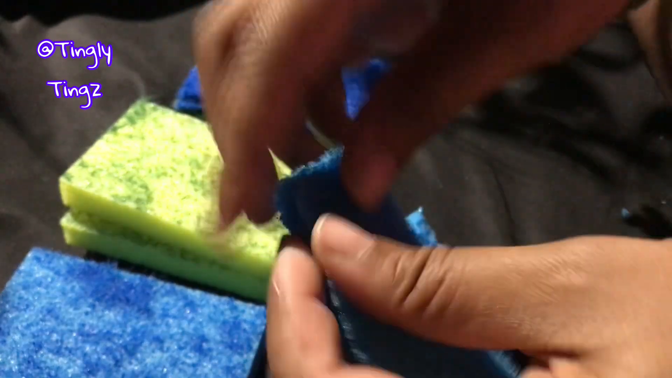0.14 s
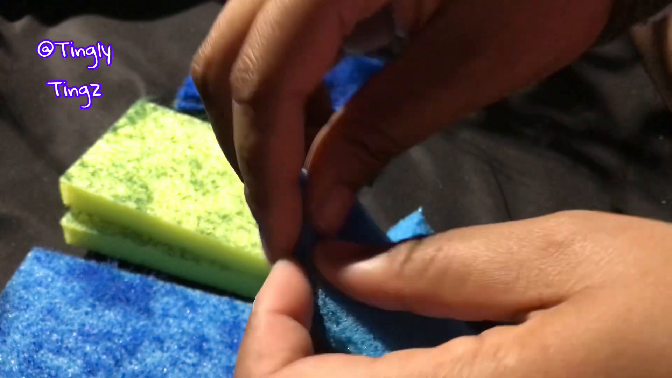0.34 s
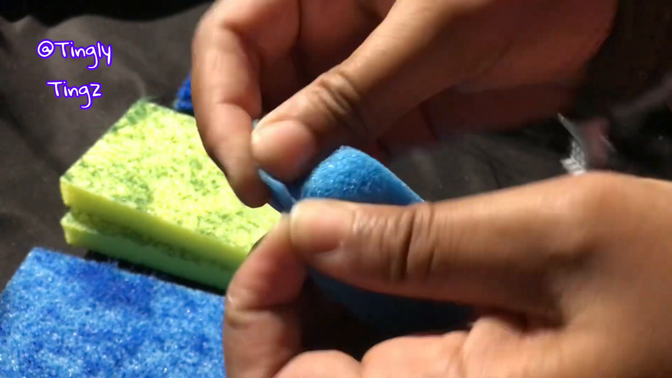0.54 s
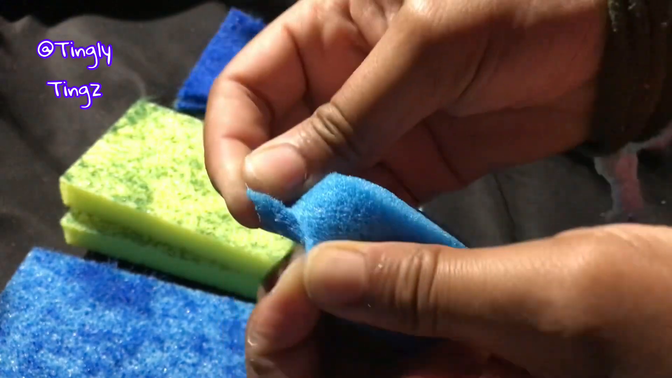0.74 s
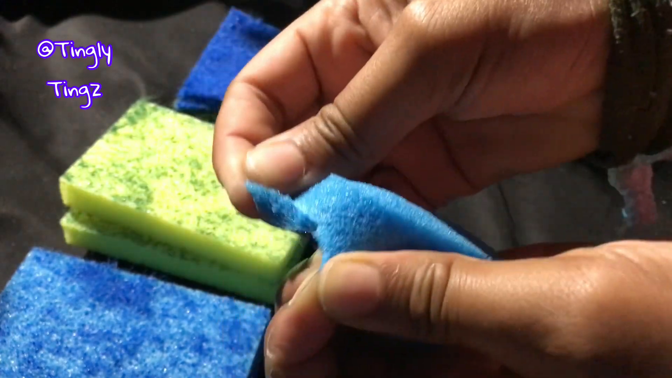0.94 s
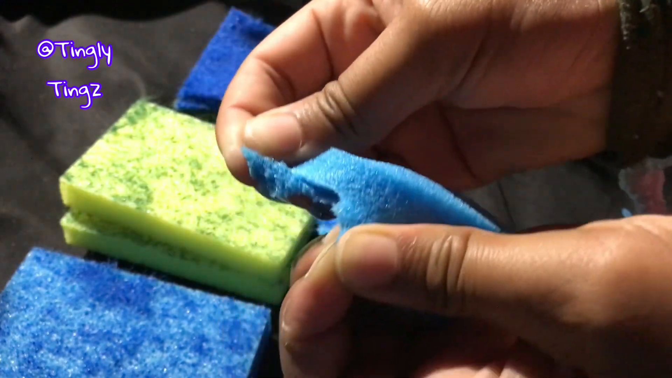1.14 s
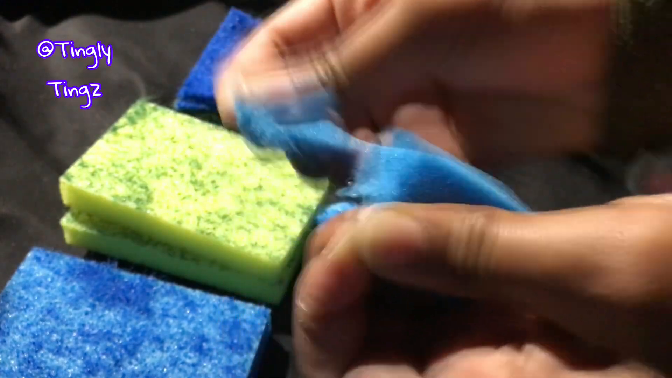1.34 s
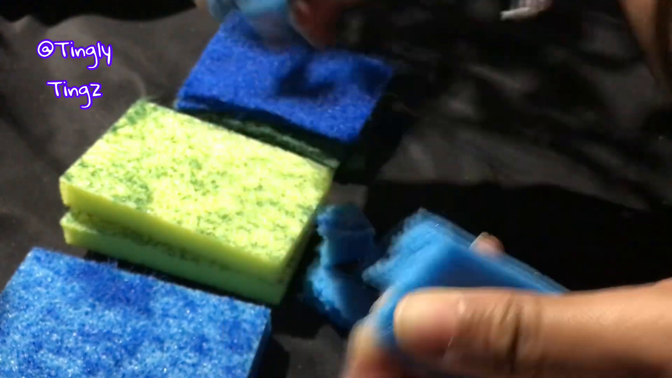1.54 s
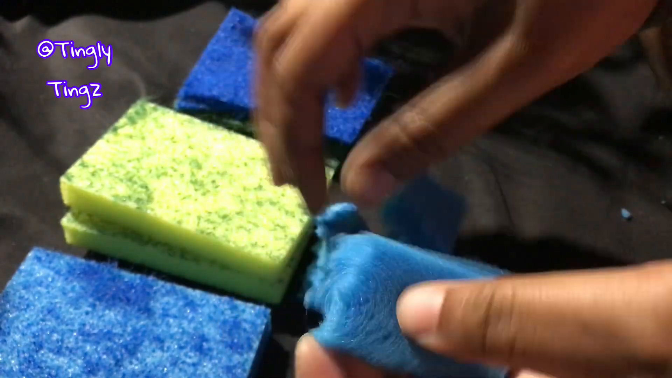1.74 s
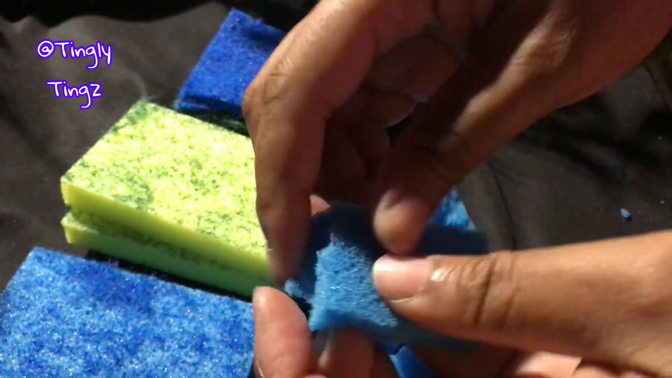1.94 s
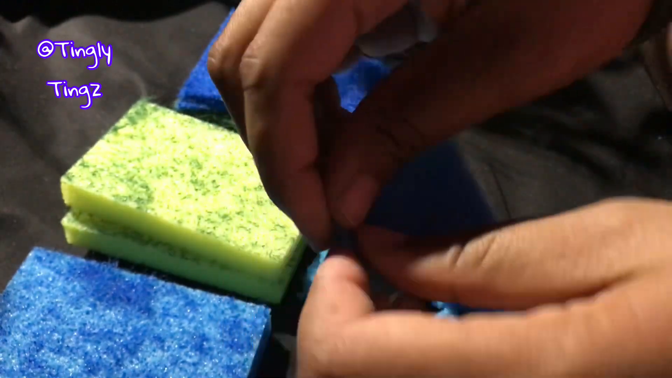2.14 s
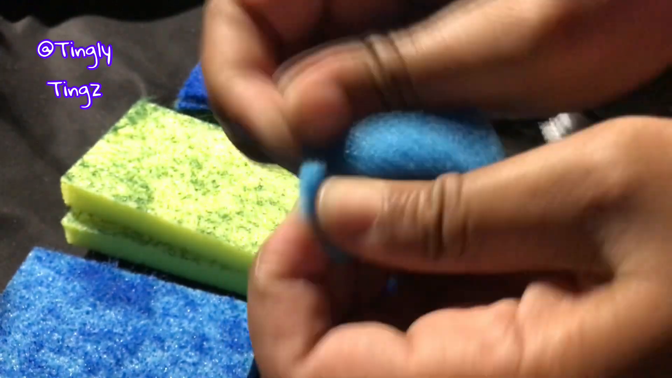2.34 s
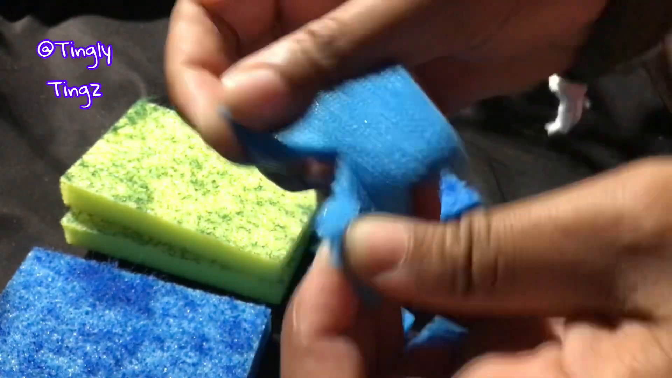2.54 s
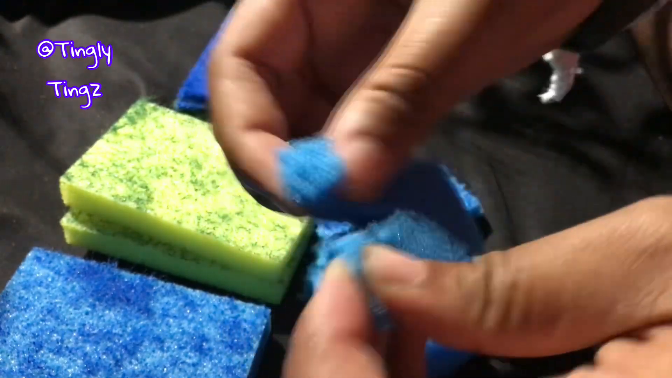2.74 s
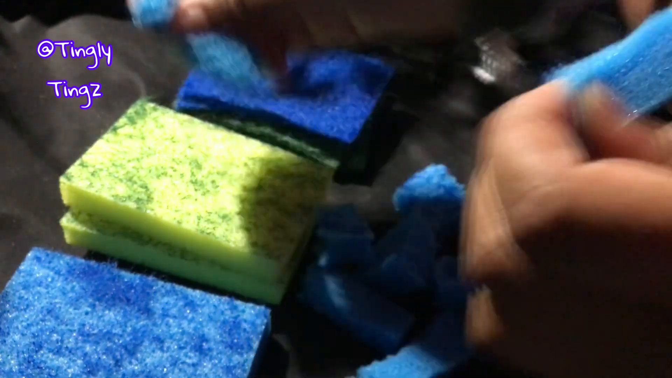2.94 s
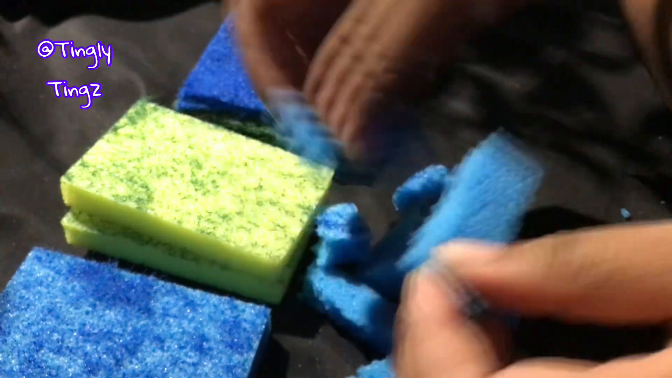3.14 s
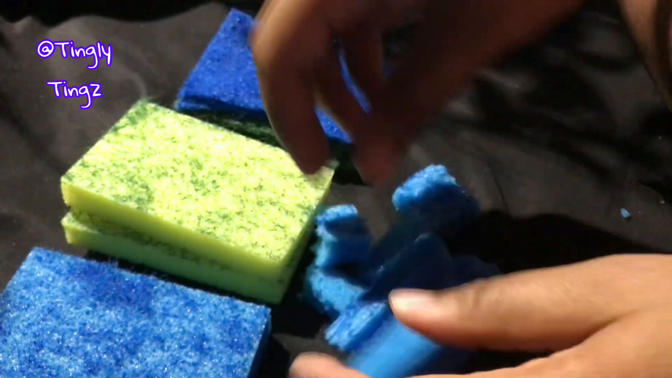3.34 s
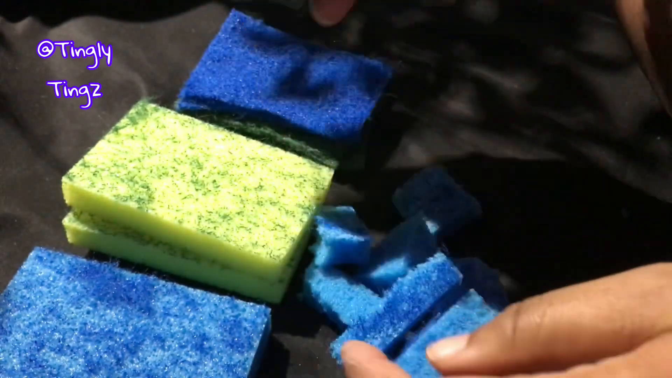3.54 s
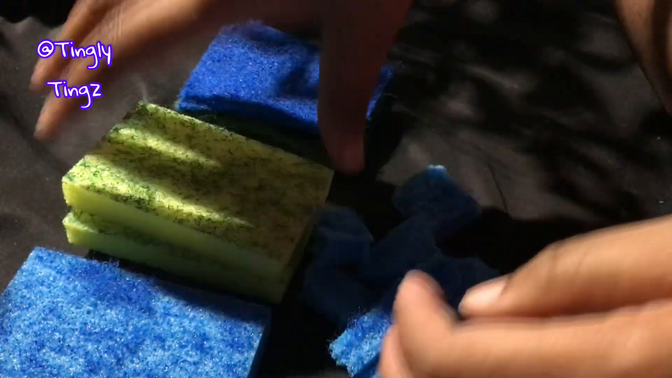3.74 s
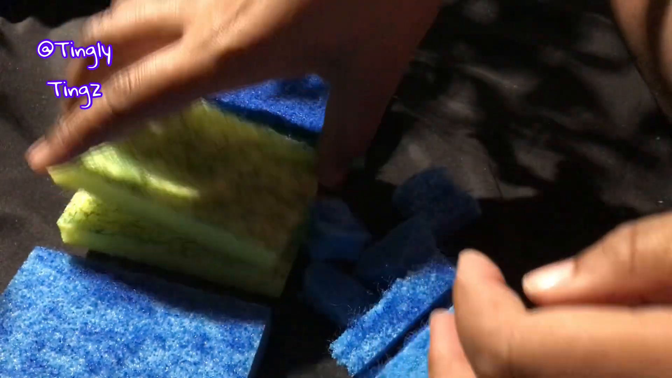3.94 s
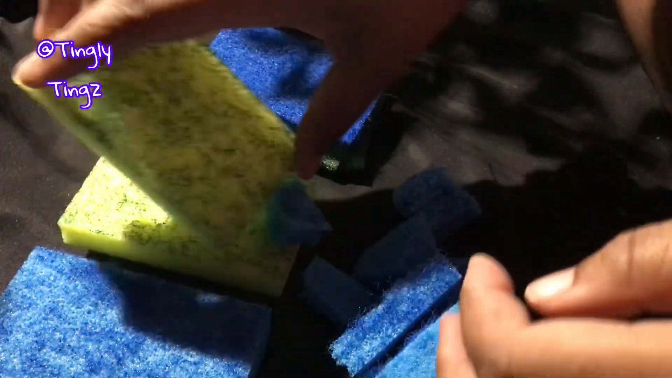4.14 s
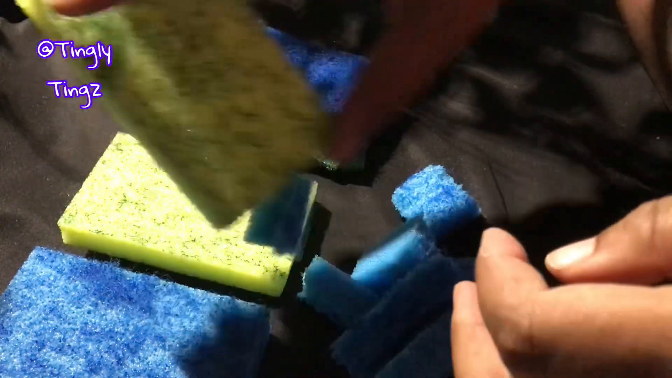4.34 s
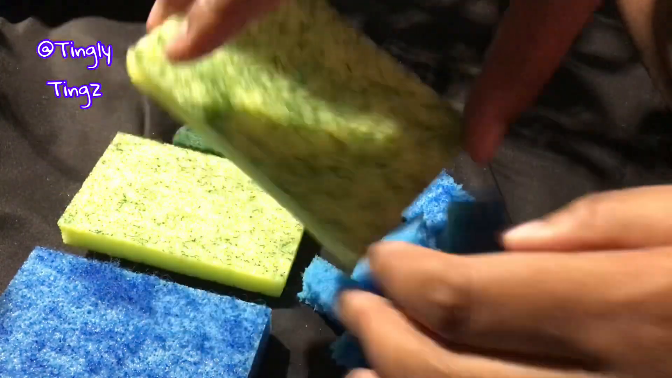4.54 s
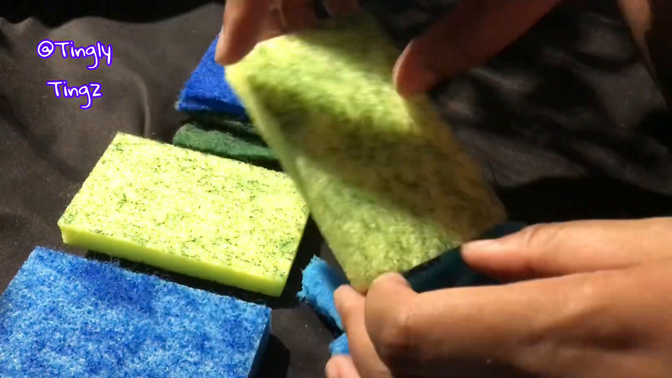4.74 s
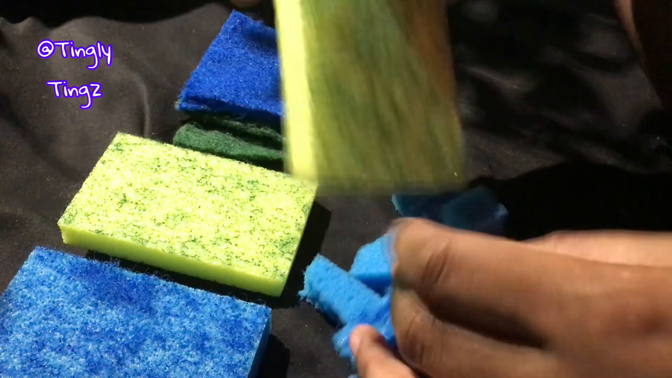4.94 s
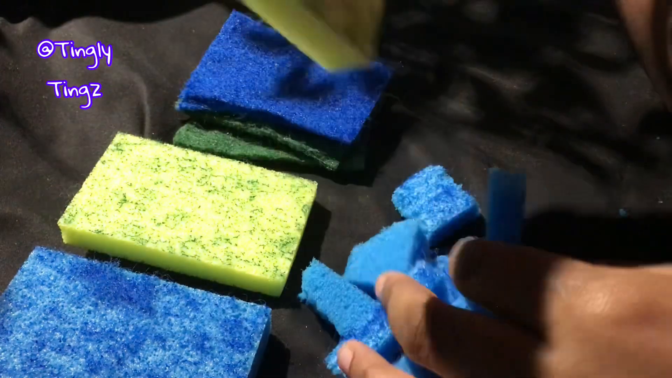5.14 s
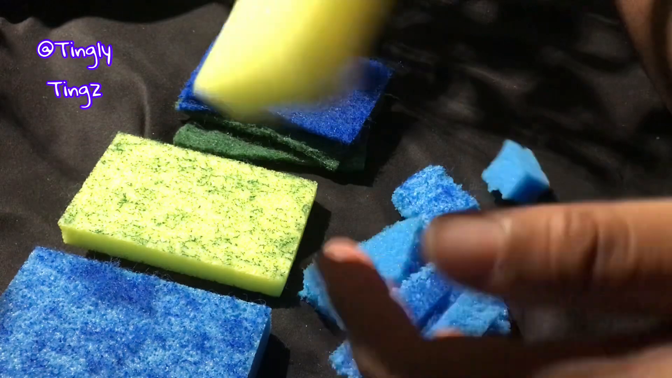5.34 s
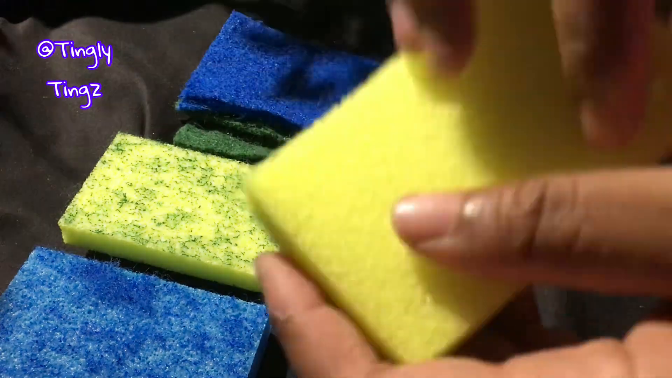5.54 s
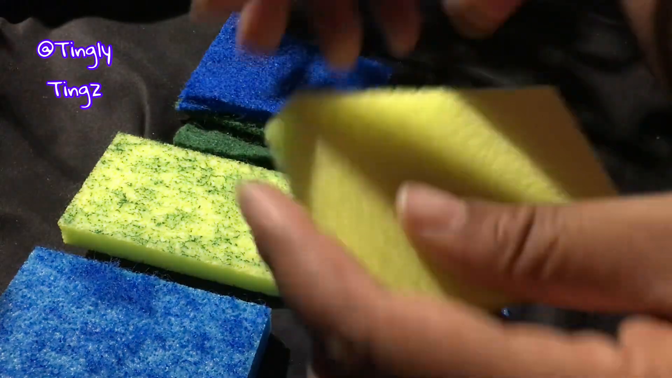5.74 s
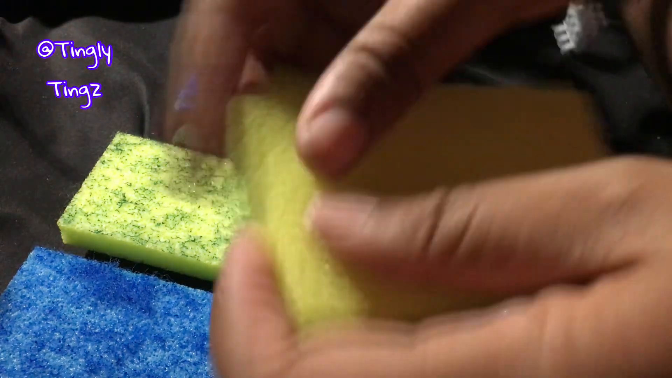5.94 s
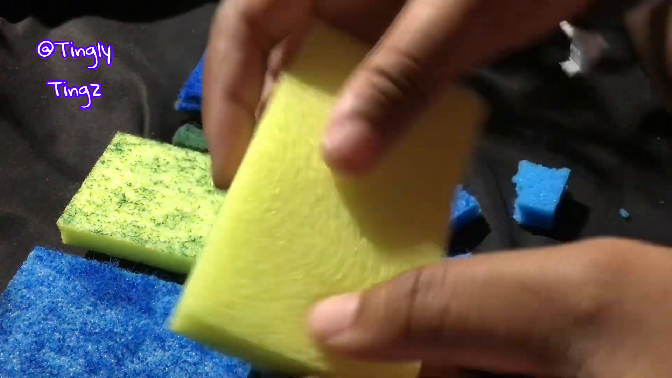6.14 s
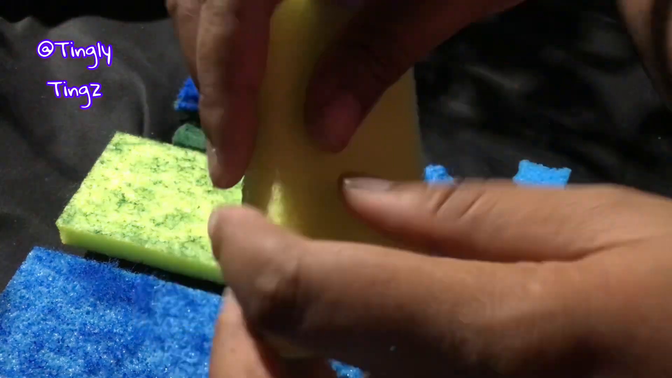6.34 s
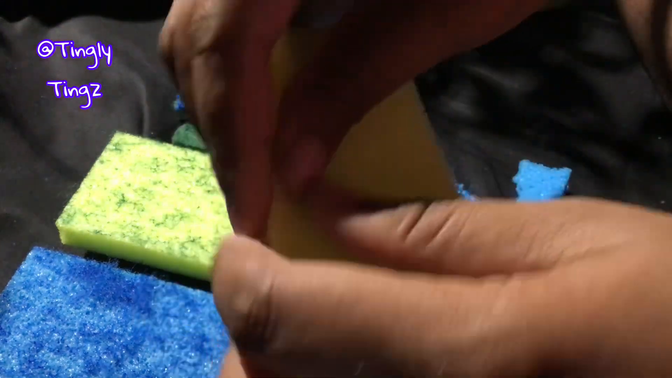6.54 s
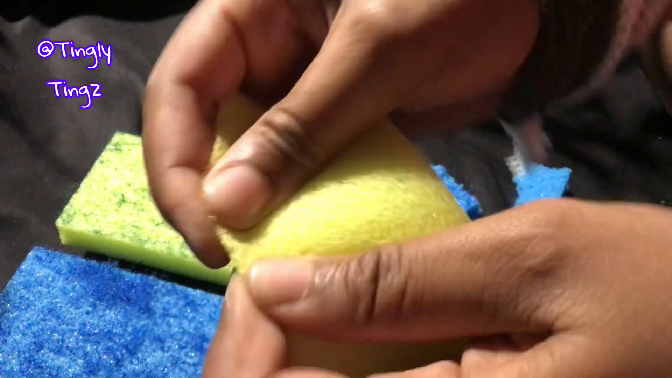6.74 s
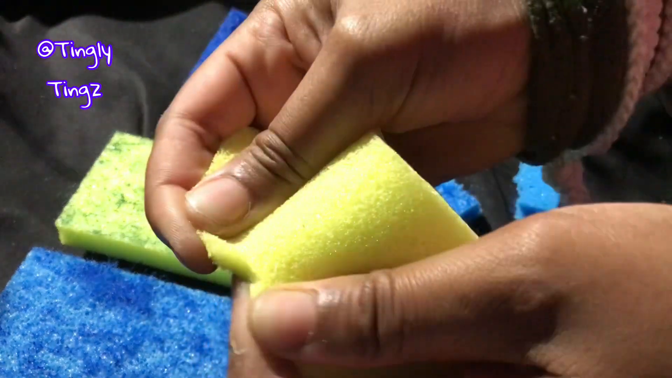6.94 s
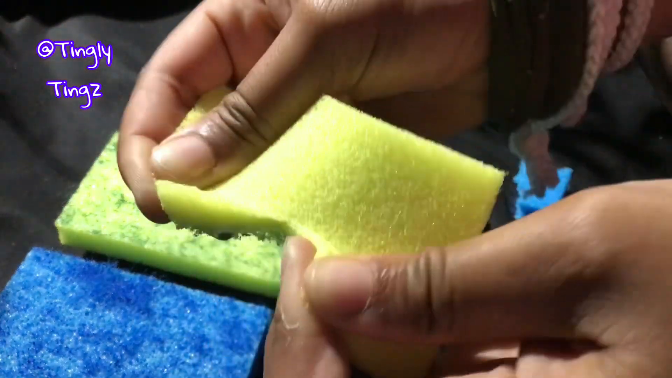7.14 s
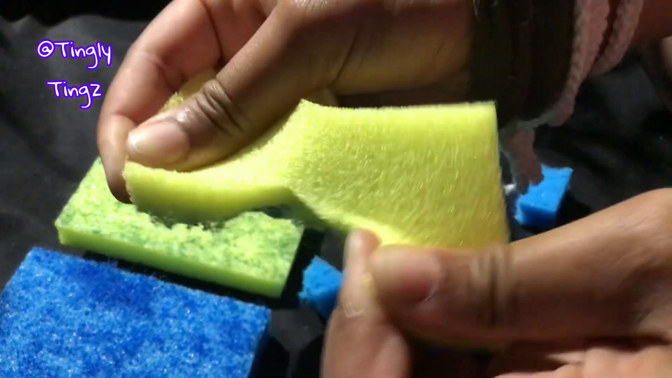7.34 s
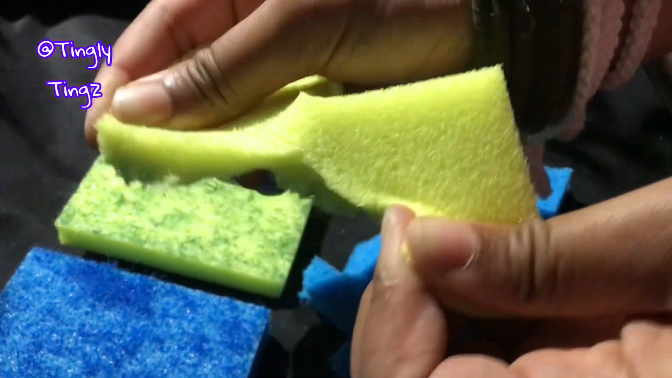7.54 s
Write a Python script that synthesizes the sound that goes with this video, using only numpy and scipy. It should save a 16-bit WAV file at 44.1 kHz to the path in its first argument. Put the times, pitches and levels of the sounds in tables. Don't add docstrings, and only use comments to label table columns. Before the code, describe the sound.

In a quiet, fairly dry room, hands tear foam sponges very close to the microphone. A slow crackling peel ends in a sharp rip, then two quick rips follow. A long stretch of faint brushing and handling leads to a fresh sponge tearing in grainy bursts. An appliance hums and whines thinly throughout, and a far low motor swells late.

```python
import sys
import numpy as np
from scipy import signal
from scipy.fft import rfft, irfft, next_fast_len
from scipy.io import wavfile

SR = 44100
rng = np.random.default_rng(int(sys.argv[2]) if len(sys.argv) > 2 else 0)


def transcribe(u):
    v = np.clip(np.atleast_2d(u).T, -1, 1)
    q = np.round(v * 32767).astype(np.int16)
    wavfile.write(sys.argv[1], SR, q)


def natural_amplitude(level_db):
    exponent = np.asarray(level_db, float) / 20
    return 10 ** exponent


N = 339129

# (frequency [Hz], level [dB rms])
MAINS_HUM = [
    (120, -67.5),
    (240, -49),
]
# (multiple, level [dB rms], throb depth [0-1], first crest [s])
ROTOR_HUMS = [
    (4, -42, 0.19, 0.6),
    (5, -45, 0.39, 0.86),
    (8, -47, .05, 0.2),
]
# (frequency [Hz], level [dB rms])
FAINT_TONES = [(258.2, -56.5), (281.7, -94), (360, -62), (517, -68.5), (775, -71), (1086, -71.5),
               (2401.5, -103)]
# (time [s], level [dB])
WHINE_STRENGTH = [(0, -44.5), (.45, -51.5), (.86, -39.5), (1.24, -54.5), (1.6, -47), (1.85, -49.5),
                  (2.16, -40.5), (2.5, -57), (3.05, -47), (3.32, -43), (3.55, -55.5), (3.75, -52),
                  (3.95, -54), (5.3, -53.5), (5.59, -47), (6.6, -47), (6.85, -44), (7.3, -44.5)]
WHINE_PITCHES = 2319.0, 2236.0, 2246.0
# (middle [s], half length [s], frequency [Hz], level [dB rms])
CASING_SONGS = [(.9, .35, 2237, -55), (1.95, .4, 2240, -54), (2.8, .7, 2402, -67), (4.8, .4, 2236, -58.5),
                (5.5, 1.0, 2402, -63), (6.1, 1.0, 1086, -62), (7.15, .6, 2402, -64)]
# (frequency [Hz], width [Hz], level [dB rms])
CASING_RINGS = [(2301, 42, -49.5), (2255, 110, -61), (2370, 7.8, -74), (1080, 155, -59), (1415, 13, -69.5),
                (1748, 53, -68), (3177, 280, -66.5), (175.8, 35, -51), (9200, 880, -78.5),
                (12070, 400, -83)]
# (frequency [Hz], level [dB per Hz])
AIR_COLOUR = [(20, -29), (45, -14.5), (100, -1.5), (250, -6), (330, -11.5), (460, -18.5), (900, -15),
              (1500, -26), (2400, -23.5), (2760, -34), (3500, -37), (4600, -39.5), (9000, -47),
              (16000, -45.5)]
# (middle [s], length [s], level [dB])
BRUSH_STROKES = [(0.016, 0.026, -75), (.21, 0.29, -62.5), (1.5, 0.26, -66), (1.619, 0.042, -59.5),
                 (1.762, .1, -74), (2.013, 0.038, -58), (2.157, .08, -71), (2.55, 0.36, -66),
                 (2.677, .04, -63), (2.817, 0.08, -64), (3.0, 0.13, -70), (3.296, .03, -63),
                 (3.617, 0.065, -56.5), (3.863, .1, -69), (3.942, .08, -63), (4.593, .04, -65.5),
                 (4.69, 0.051, -67), (4.858, .18, -64), (5.07, 0.22, -65.5), (5.318, .04, -69),
                 (5.5, 0.14, -63.5), (5.63, 0.2, -60), (5.817, 0.2, -59.5), (5.968, 0.052, -49),
                 (6.05, 0.17, -52), (6.162, .045, -53), (6.237, .12, -68), (6.378, 0.28, -66),
                 (6.523, 0.04, -52.5), (6.66, 0.44, -64)]
# (start [s], length [s], first level [dB], last level [dB], cells re strands [dB])
FOAM_PULLS = [(0.493, 0.13, -61.5, -44, -6), (0.603, 0.38, -50, -52, -11), (.885, 0.056, -41, -46, -9.5),
              (0.965, 0.15, -44.5, -42, -8), (1.116, 0.13, -51, -49, -9.5), (1.229, 0.1, -41, -42.5, -7.5),
              (1.346, 0.031, -31, -28.5, -4), (2.272, 0.048, -53, -61, -6), (2.333, 0.035, -55, -39, -11),
              (2.376, 0.041, -30.5, -29, -3.5), (2.429, 0.028, -26, -39.5, -11.5),
              (2.458, .055, -51, -63, -3.5), (2.852, 0.06, -33.5, -24.5, -7.5),
              (6.755, 0.07, -58, -43.5, -12), (6.828, 0.14, -46, -51, -10.5),
              (6.975, .045, -42.5, -39, -12), (7.032, 0.096, -33, -40.5, -6.5),
              (7.124, 0.037, -43, -53, -5), (7.178, 0.063, -49.5, -44, -10),
              (7.239, .045, -41, -33.5, -7.5), (7.287, 0.083, -31, -39, -8), (7.375, 0.061, -47, -35, -6),
              (7.445, .14, -32.5, -45, -9), (7.59, .1, -41.5, -38, -8.5)]
# (time [s], peak [dB], cells re peak [dB])
PEEL_BREAKS = [(0.4979, -52, 7), (0.5081, -45, -11), (0.5198, -45, -16), (0.5264, -45, -14),
               (0.5981, -41, -9), (0.612, -41, 1), (0.7254, -41, -3), (0.7708, -38, -15),
               (0.8527, -28.5, -14), (0.8611, -23.5, -8.5), (0.8865, -25, -11), (0.8928, -32, -5),
               (0.9782, -31.5, -2.5), (0.9915, -37, -17), (1.006, -39, -4), (1.0225, -39, -19),
               (1.0322, -36, -11), (1.0662, -30, -4), (1.0734, -31, -3), (1.1374, -39, -11),
               (1.145, -32, -2), (1.1637, -37, -11), (1.178, -41, -12), (1.213, -38, -7),
               (1.2299, -34.5, -1), (1.254, -33.5, 0.5), (1.2733, -31, -9), (1.3315, -37, -8),
               (1.3382, -26, -17)]
# (time [s], peak [dB], cells re peak [dB])
RIP_BREAKS = [(1.3488, -19.5, -8), (1.352, -17, -10), (1.3751, -20, 2), (1.4755, -62, 8),
              (2.3107, -35.5, -7), (2.3251, -34, -10), (2.3474, -30, -14), (2.3626, -28, -17),
              (2.3814, -31, -1), (2.388, -31, 9), (2.401, -24, -5), (2.4232, -21, -3), (2.441, -28.5, 2.5),
              (2.453, -32, -7), (2.6627, -44.5, -3), (2.8414, -31, -10), (2.845, -26, -10),
              (2.8558, -19, -9), (2.869, -30, -4), (2.8805, -25, -8), (2.9152, -20.5, -6), (3.063, -54, 3),
              (4.165, -70.5, 8), (5.474, -42, -12), (5.524, -52, 3), (5.747, -55, 10), (5.879, -55, 0),
              (6.159, -36, -6), (6.352, -47, -2)]
# (time [s], peak [dB], cells re peak [dB])
FRESH_BREAKS = [(6.7583, -39.5, -9), (6.771, -41, -9), (6.7944, -37, -19), (6.8923, -32, -5.5),
                (6.9713, -27, -15), (6.9899, -36, -13), (7.0055, -26, -16), (7.031, -33, -14),
                (7.0784, -30.5, -1), (7.1073, -31, -1), (7.123, -26, -4), (7.1842, -36, -8),
                (7.2098, -39, -5), (7.2152, -41, 4), (7.235, -33, -1), (7.244, -27.5, 2.5),
                (7.2505, -33, 6.5), (7.3026, -30.5, 3.5), (7.309, -32, -9), (7.351, -31.5, 1),
                (7.3557, -33, 3), (7.3794, -34.5, 1), (7.4124, -27.5, -4), (7.423, -33, -1),
                (7.4391, -28, -1), (7.4555, -36, -7), (7.4988, -30.5, -1.5), (7.5169, -31, -8),
                (7.5349, -33, -7), (7.6486, -30, -14)]
# (frequency [Hz], level [dB per band])
STRAND_BANDS = [(6500, -8.5), (8200, -23.5), (9600, -5.5), (11300, 0), (13000, 0.5), (14300, -21),
                (15600, 7)]
# (frequency [Hz], level [dB per band])
CELL_BANDS = [(hz, 0) for hz in np.geomspace(2300, 9000, 9)]
# (frequency [Hz], level [dB per Hz])
BODY_COLOUR = [(200, -17), (450, -7), (700, -0.5), (1000, -0.5), (1600, 0.5), (2400, -5.5), (4000, -44)]
# (time [s], tilt [dB per octave])
CELL_FINENESS = [(.6, -6), (.9, 0), (1.2, 10), (1.38, -0.5), (2.4, -1.5), (2.88, -0.5), (3.6, 7),
                 (5.5, -1.5), (6.8, -4), (7.05, 2.5), (7.3, -1.5), (7.5, 7)]
# (time [s], frequency [Hz], peak [dB], t60 [s])
PIECE_RECOILS = [
    (1.3495, 1200, -26, .008),
    (1.3758, 605, -34.5, .047),
    (1.3762, 900, -14.5, .0055),
    (2.881, 616, -29, .028),
    (2.9145, 800, -29, .01),
    (2.915, 45, -38, .15),
    (7.2445, 720, -25, .012),
]
# (time [s], frequency [Hz], level [dB])
FAR_MOTOR_PATH = [
    (5.6, 138, -72),
    (6.2, 131, -50),
    (6.8, 125.5, -45.5),
    (7.3, 127.2, -38.5),
    (7.69, 127.6, -43),
]
# (frequency [Hz], width [Hz], depth [0-1])
REFLECTION_DIPS = [(4920, 160, 0.63), (7520, 350, 0.27), (10400, 520, 0.58)]


def seconds():
    return np.arange(N) / SR


def rms_one(x):
    return x / np.sqrt(np.mean(x ** 2) + 1e-20)


def in_time(rows):
    s, *columns = np.transpose(rows)
    return [np.interp(seconds(), s, column) for column in columns]


def coloured(spectrum):
    size = next_fast_len(N)
    hz, db = np.transpose(spectrum)
    log_hz = np.log(np.arange(size // 2 + 1) * SR / size + 1)
    gains = natural_amplitude(np.interp(log_hz, np.log(hz), db))
    white = rng.standard_normal(size)
    return rms_one(irfft(rfft(white) * gains, size)[:N])


def drift(rate_hz):
    r = np.exp(-80 * np.pi * rate_hz / SR)
    white = rng.standard_normal(N // 40 + 2002)
    slow = signal.lfilter([1], [1, -2 * r, r * r], white)[2000:]
    return np.interp(np.arange(N) / 40, np.arange(len(slow)), rms_one(slow))


def tone(hz, db, wobble_hz, wobble_rate_hz):
    turns = np.cumsum(hz + wobble_hz * drift(wobble_rate_hz)) / SR + rng.random()
    return np.sqrt(2) * natural_amplitude(db) * np.sin(2 * np.pi * turns)


def dying(clicks, t60):
    return signal.lfilter([1], [1, -natural_amplitude(-60 / (t60 * SR))], clicks + 1e-18)


def mains_hum():
    return sum(tone(hz, db, 0.032, 0.91) for hz, db in MAINS_HUM)


def rotor_hum():
    rotor_hz, throb_hz = 23.475, 0.631
    out = np.zeros(N)
    for multiple, db, depth, crest_s in ROTOR_HUMS:
        throb = 1 + depth * np.cos(2 * np.pi * throb_hz * (seconds() - crest_s))
        out += throb * tone(multiple * rotor_hz, db, 0.019, 1.75)
    return out


def faint_tones():
    return sum(tone(hz, db + 0.92 * drift(1.2), 0.5, 1.62) for hz, db in FAINT_TONES)


def whine(strength_db):
    mean_db = strength_db.mean()
    pair_db = mean_db - 11.5 + 0.36 * (strength_db - mean_db)
    out = tone(WHINE_PITCHES[0], strength_db - 0.6 + 2.6 * drift(22), 3.074, 9.37)
    for hz in WHINE_PITCHES[1:]:
        out += tone(hz, pair_db + 2.5 * drift(5.1), 4.31, 14.05)
    return out


def casing_songs():
    out = np.zeros(N)
    for middle_s, half_s, hz, db in CASING_SONGS:
        fade_db = 5.2 * ((seconds() - middle_s) / half_s) ** 2
        out += tone(hz, db - fade_db, 1.53, 6.55)
    return out


def casing_rings(strength_db):
    out = np.zeros(N)
    for hz, width_hz, db in CASING_RINGS:
        r = np.exp(-np.pi * width_hz / SR)
        poles = [1, -2 * r * np.cos(2 * np.pi * hz / SR), r * r]
        once = signal.lfilter([1, 0, -1], poles, rng.standard_normal(N))
        twice = signal.lfilter([1, 0, -1], poles, once)
        near_whine = abs(hz - WHINE_PITCHES[0]) < 60
        fed_db = 0.3 * (strength_db + 42.5) * near_whine
        out += natural_amplitude(db + fed_db + 1.2 * drift(3.7)) * rms_one(twice)
    return out


def blown_air():
    return natural_amplitude(-45 + 0.6 * drift(1.5)) * coloured(AIR_COLOUR)


def appliance():
    strength_db, = in_time(WHINE_STRENGTH)
    hums = mains_hum() + rotor_hum() + faint_tones()
    casing = casing_songs() + casing_rings(strength_db)
    return hums + whine(strength_db) + casing + blown_air()


def brushing(t):
    middle, length, db = np.transpose(BRUSH_STROKES)[:, :, None]
    return db - 9.5 * np.abs(2 * (t - middle) / length) ** 3


def pulling(t):
    start, length, first_db, last_db, cells_db = np.transpose(FOAM_PULLS)[:, :, None]
    onset_db_per_s, let_go_db_per_s = 1500, 2500
    settle_db, settle_db_per_s = -10.5, 650
    before = np.maximum(start - t, 0)
    after = np.maximum(t - start - length, 0)
    progress = np.clip((t - start) / length, 0, 1)
    held_db = first_db + (last_db - first_db) * progress - onset_db_per_s * before
    release_db = np.maximum(-let_go_db_per_s * after, settle_db - settle_db_per_s * after)
    strands_db = held_db + release_db
    return strands_db, strands_db + cells_db


def handling():
    t = np.arange(0, N + 64, 32) / SR
    brush_db = brushing(t)
    pull_strands_db, pull_cells_db = pulling(t)
    strands_db = np.vstack([pull_strands_db, brush_db])
    cells_db = np.vstack([pull_cells_db, brush_db - 2.5])
    sums = [10 * np.log10(np.sum(natural_amplitude(2 * db), axis=0) + 1e-10) for db in (strands_db, cells_db, brush_db)]
    strands_db, cells_db, brush_db = in_time(np.transpose([t, *sums]))
    pulled = 1 - natural_amplitude(2 * (brush_db - strands_db))
    body_rel_db = -15.5 + 0.24 * (strands_db + 37)
    return strands_db, cells_db - strands_db, body_rel_db, pulled


def bank(bands, tilt_db, patchy_db):
    centres, level_db = np.transpose(bands)[:, :, None]
    octaves = np.log2(centres / np.mean(centres))
    patches_db = [patchy_db * drift(4.1) for _ in bands]
    gains = natural_amplitude(level_db + tilt_db * octaves + patches_db)
    noises = []
    for hz, _ in bands:
        noises.append(coloured([(hz / 2.5, -40), (hz / 1.09, 0), (hz * 1.09, 0), (hz * 2.5, -40)]))
    return np.sum(gains * noises, axis=0) / np.sqrt(np.sum(gains ** 2, axis=0))


def ruptures(per_s, spread_db, t60, clump_db):
    born = rng.random(N) < per_s * natural_amplitude(clump_db * drift(25)) / SR
    sizes = natural_amplitude(spread_db * np.minimum(rng.exponential(1, N), 4))
    return dying(born * sizes ** 2, 2 * t60)


def radiate(noise, level_db, tearing, grain, hit_db, t60):
    break_s = np.transpose(PEEL_BREAKS + RIP_BREAKS + FRESH_BREAKS)[0]
    hits = np.zeros(N)
    hits[np.round(break_s * SR).astype(int)] = natural_amplitude(hit_db)
    texture = np.sqrt(1 - tearing + tearing * grain / np.mean(grain))
    burst = dying(hits, t60) - dying(hits, 0.00062)
    return noise * np.hypot(natural_amplitude(level_db) * texture, burst)


def foam():
    strands_db, cells_rel_db, body_rel_db, pulled = handling()
    fine = ruptures(per_s=3300, spread_db=5.5, t60=0.0011, clump_db=2.5)
    coarse = ruptures(per_s=320, spread_db=3.5, t60=0.001, clump_db=-1.0)
    tearing = np.interp(strands_db, [-66, -50, -32], [.2, .85, .5]) * (0.63 + 0.53 * pulled)
    _, peak_db, cells_db = np.transpose(PEEL_BREAKS + RIP_BREAKS + FRESH_BREAKS)
    body_db = 0.63 * cells_db - 9
    cell_tilt_db, = in_time(CELL_FINENESS)

    strand_noise = bank(STRAND_BANDS, -1.2 * (cells_rel_db + 6), patchy_db=6.5)
    cell_noise = bank(CELL_BANDS, cell_tilt_db, patchy_db=3.0)
    body_noise = coloured(BODY_COLOUR)
    strands = radiate(strand_noise, strands_db - 0.5, tearing, fine + 0.3 * coarse, peak_db + 1.5, t60=0.008)
    cells = radiate(cell_noise, strands_db + cells_rel_db - 0.5, tearing,
                    0.095 * fine + coarse, peak_db + cells_db - 0.5, t60=0.012)
    body = radiate(body_noise, strands_db + body_rel_db, tearing,
                   0.088 * fine + coarse, peak_db + body_db + 2.0, t60=0.014)
    return strands + cells + body


def room(x, t60=0.2, cut_hz=7000):
    t = np.arange(SR // 5) / SR
    tail = rng.standard_normal(len(t)) * natural_amplitude(-60 * t / t60) * (t > .003)
    tail = signal.lfilter(*signal.butter(1, cut_hz, fs=SR), tail)
    return signal.fftconvolve(x, tail / np.sqrt(np.sum(tail ** 2)))[:N]


def recoils():
    out = np.zeros(N)
    for start_s, hz, db, t60 in PIECE_RECOILS:
        t = np.maximum(seconds() - start_s, 0)
        out += natural_amplitude(db - 60 * t / t60) * np.sin(2 * np.pi * hz * t)
    return out


def far_motor():
    hz, db = in_time(FAR_MOTOR_PATH)
    return tone(hz, db, 0.33, 3.1)


def open_split(tearing_sound):
    opens_s, ring_hz, width_hz, gain = 7.15, 4500, 900, 0.7
    ring = signal.lfilter(*signal.iirpeak(ring_hz, ring_hz / width_hz, fs=SR), tearing_sound)
    return gain * ring * (seconds() > opens_s)


def scene():
    torn = foam()
    close = torn + open_split(torn) + recoils()
    return (close + natural_amplitude(-33) * room(close) + appliance() + far_motor())[None]


def band_limit(x):
    return signal.sosfilt(signal.butter(12, 17000, fs=SR, output="sos"), x)


def record(dry):
    for hz, width_hz, depth in REFLECTION_DIPS:
        dry = dry - depth * signal.lfilter(*signal.iirpeak(hz, hz / width_hz, fs=SR), dry)
    top_cut = signal.ellip(14, .5, 75, 15760, fs=SR, output="sos")
    mix = signal.sosfilt(top_cut, dry)
    return band_limit(mix)


dry = scene()
out = record(dry)
transcribe(out)
```